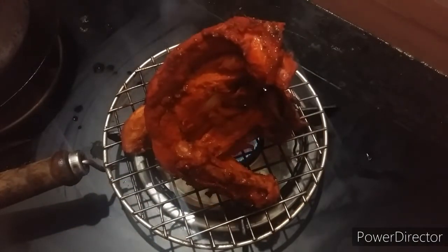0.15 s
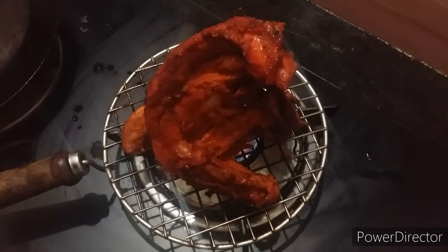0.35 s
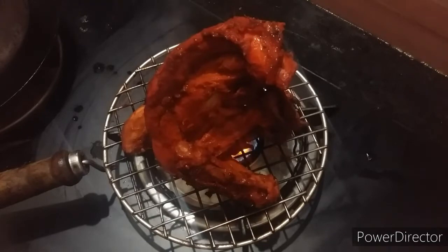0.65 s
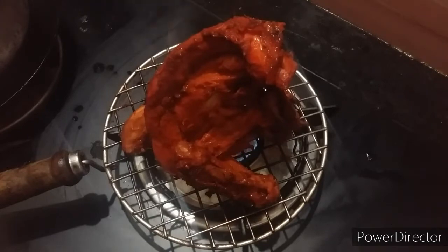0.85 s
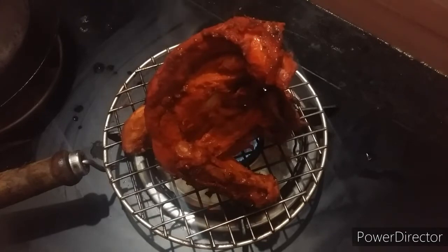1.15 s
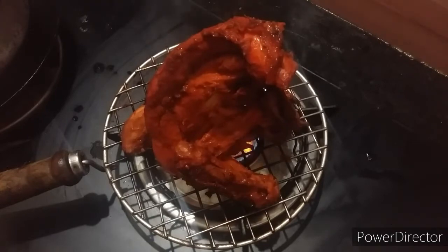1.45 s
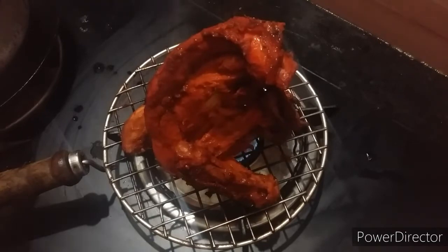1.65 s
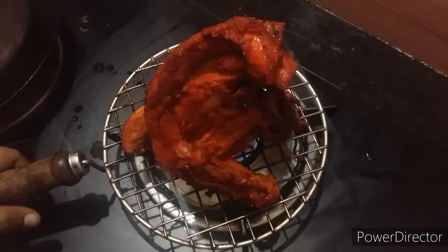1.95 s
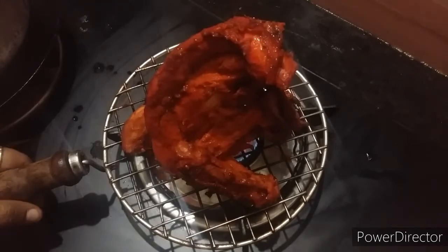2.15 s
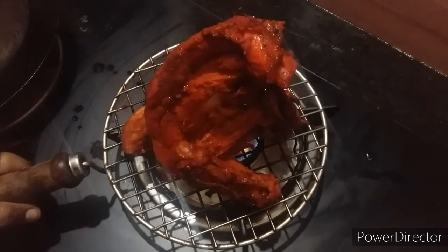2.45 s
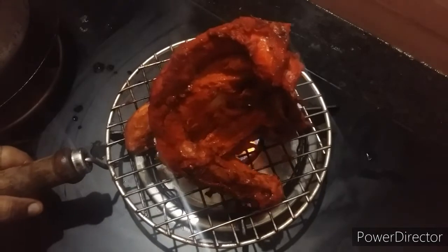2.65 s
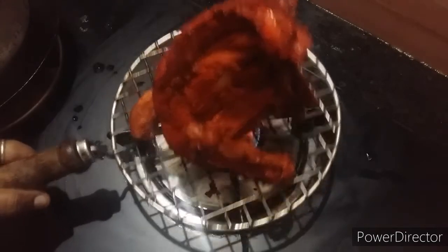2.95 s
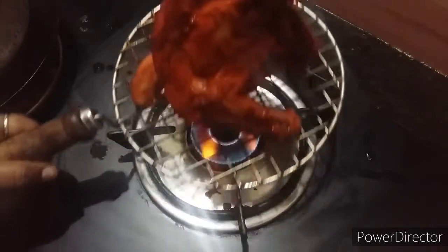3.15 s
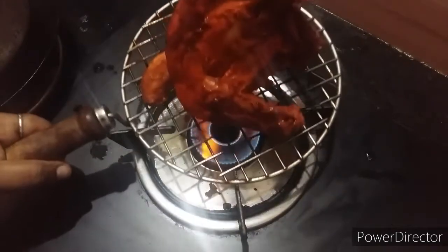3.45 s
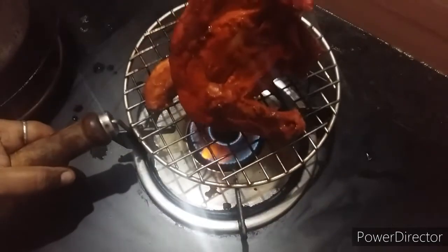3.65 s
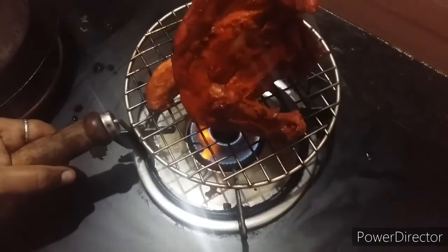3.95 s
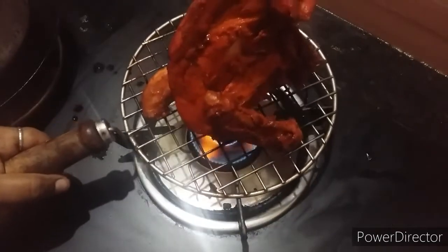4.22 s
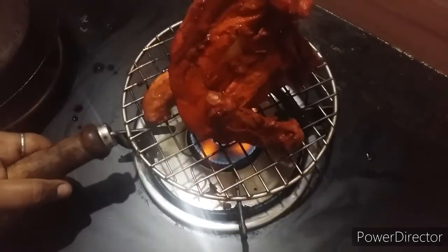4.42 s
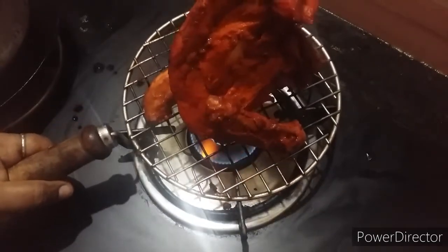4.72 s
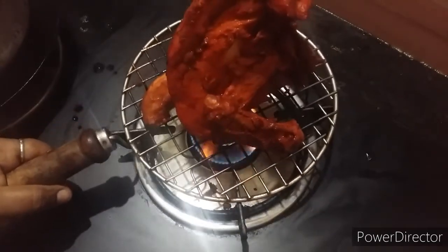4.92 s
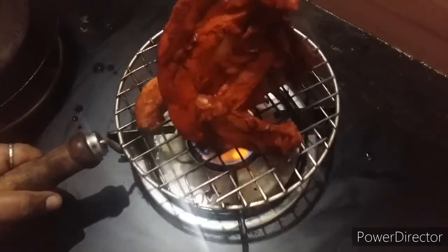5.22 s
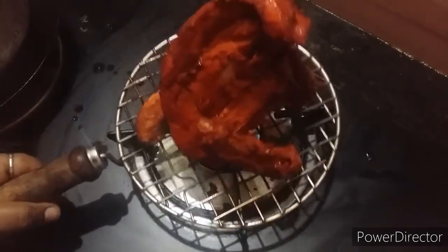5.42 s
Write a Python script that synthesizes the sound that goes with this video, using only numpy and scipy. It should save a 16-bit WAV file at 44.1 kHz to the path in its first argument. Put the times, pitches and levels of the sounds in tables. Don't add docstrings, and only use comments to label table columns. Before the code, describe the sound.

Chicken sizzles weakly on a wire rack over gas, with low room rumble and slight microphone hiss that swell and duck around each sound. A distant explosion-like bang opens the scene, then a muffled low thud. Light ticks lead to hollow metallic bumps and short scrapes as the rack is moved, with bright snaps of fat close to the microphone.

```python
import sys
import numpy as np
from scipy import signal
from scipy.fft import rfft, irfft, next_fast_len
from scipy.io import wavfile
from scipy.ndimage import uniform_filter1d, map_coordinates

SR = 44100
rng = np.random.default_rng(int(sys.argv[2]) if len(sys.argv) > 2 else 0)


def nominal_scale(level):
    x = np.asarray(level, float) / 20
    return 10 ** x


def wrap_up_sound(samples):
    columns = np.atleast_2d(samples).T
    tamed = np.clip(columns, -1, 1)
    steps = np.round(tamed * 32767).astype(np.int16)
    wavfile.write(sys.argv[1], SR, steps)


N = 246209


def unit(x):
    return x / np.sqrt(np.mean(x ** 2) + 1e-20)


def along(points, hz):
    f, v = np.transpose(points)
    return np.interp(np.log(hz + 1), np.log(f + 1), v)


def coloured(x, spectrum, humps=()):
    m = next_fast_len(N + 8192)
    hz = np.fft.rfftfreq(m, 1 / SR)
    lift = 1 + sum(nominal_scale(db) / (1 + (2 * (hz - c) / w) ** 2) for c, w, db in humps)
    return unit(irfft(rfft(x, m) * nominal_scale(along(spectrum, hz)) * lift, m)[:N])


def wobble(rate):
    knots = rng.standard_normal(int(N * rate / SR) + 4)
    return map_coordinates(knots, [np.arange(N) * rate / SR])


def flutter(rate):
    curve = wobble(rate)
    return unit(curve - uniform_filter1d(curve, size=SR // 14))


def patchy(patchy_db):
    z = signal.stft(rng.standard_normal(N + 1024), nperseg=1024)[2]
    field = uniform_filter1d(rng.standard_normal(z.shape), size=4, axis=0)
    field = uniform_filter1d(field, size=5, axis=1)
    return signal.istft(z * nominal_scale(patchy_db * unit(field)), nperseg=1024)[1][:N]


def crackle(rate, spread_db):
    struck = rng.random(N) < rate / SR
    return unit(struck * rng.standard_normal(N) * nominal_scale(spread_db * rng.random(N)))


def ring(modes, t, t60):
    return sum(nominal_scale(db + rng.normal(0, 1) - 60 * t / t60) * np.sin(2 * np.pi * hz * t) for hz, db in modes)


def smooth(coarse):
    return np.interp(np.arange(N), 32 * np.arange(len(coarse)), coarse)


def swells(rows, rise_s, fall_db_per_s):
    t = np.arange(0, N, 32) / SR
    power = 0
    for s, db, hold in rows:
        rise = np.clip((t - s) / rise_s, 0, 1)
        fall_db = fall_db_per_s * np.clip(t - s - rise_s - hold, 0, None)
        power = power + (rise * nominal_scale(db - fall_db)) ** 2
    return smooth(np.sqrt(power))


# frequency in Hz, level in dB per Hz.
SIZZLE_SPECTRUM = [(1000, -38), (1700, -9), (1770, -12.5), (2210, -10.5), (2380, -9), (2900, -7.5),
                   (3670, -2.5), (3800, -1.5), (3960, 0.5), (4680, -1.5), (5080, -4), (5390, -6.5),
                   (6000, -13), (7000, -16), (9100, -20), (15400, -120)]
# frequency in Hz, width in Hz, level in dB.
HOUSING = [(2290, 130, -4), (3883, 110, -1.5), (4380, 79, -6), (5380, 94, -12)]


def sizzle(treble_db, flicker):
    level_db = -67 + np.minimum(treble_db, 12)
    bubbles = unit(patchy(patchy_db=1.0)) + 0.49 * crackle(rate=500, spread_db=12)
    gain = nominal_scale(level_db + 0.89 * flicker + 0.67 * flutter(rate=11))
    return gain * coloured(bubbles, SIZZLE_SPECTRUM, HOUSING)


# start in seconds, peak in dB, port ring in Hz, click level in dB.
FAT_SPITS = [(0.6804, -49, 3860, -17), (0.768, -55, 3940, -18), (1.6912, -45, 3940, -23),
             (2.0322, -51, 3750, -18), (2.3286, -55, 3960, -11), (2.8134, -52.5, 4100, -11),
             (3.2356, -58, 4170, -12), (3.276, -45.5, 3680, -13), (3.458, -53.5, 3970, -12),
             (3.478, -43, 4070, -15.5), (3.6766, -45, 3700, -27), (3.9526, -39.5, 4180, -32),
             (4.1864, -32, 4170, -22.5), (4.57, -35, 4340, -20), (4.5824, -38, 4060, -25),
             (4.794, -47.5, 4040, -17.5), (4.9049, -39.5, 3870, -21.5), (5.0953, -52, 4070, -15),
             (5.4814, -64, 4490, -17)]
# frequency in Hz, level in dB per Hz.
CLICK_SPECTRUM = [(800, -10), (2000, -23), (4200, 3.5), (6500, -9), (9500, -13.5), (11500, -20),
                  (16000, -64)]


def spits():
    out, t = np.zeros(N + SR), np.arange(SR // 8) / SR
    hiss = coloured(rng.standard_normal(N), CLICK_SPECTRUM)
    for s, db, hz, click_db in FAT_SPITS:
        at = round(s * SR)
        modes = [(hz, 0), (hz * 0.97, -5), (hz * 1.2, -5), (hz * 0.75, -8), (hz * 0.48, -10), (hz * 0.3, -14)]
        port = ring(modes, t, t60=0.019)
        click = nominal_scale(click_db + 18 - 60 * t / 0.028) * hiss[at // 2:][:len(t)]
        onset = 1 - np.exp(-t / 0.0014)
        out[at:][:len(t)] += nominal_scale(db - 3.5) * onset * (port + click)
    return out[:N]


# start in seconds, peak in dB, body note in Hz, wire level in dB,
# rim level in dB.
RACK_KNOCKS = [(0.009, -48, 162, -11, 2.5), (1.378, -52.5, 223, -9, -9), (1.564, -51.5, 190, 2.5, -2),
               (1.876, -48, 189, -23, -15), (2.398, -48.5, 420, -7, -4), (2.814, -50.5, 360, -5, -21),
               (2.838, -44.5, 388, -25, -22), (2.884, -49, 213, -14, -22), (2.905, -42.5, 241, -13, -24),
               (2.952, -45, 394, -16, -13), (2.977, -33.5, 391, -15, -36), (2.999, -45, 405, -21, -16),
               (3.042, -56, 363, -10, -15), (3.088, -50, 215, -14, -12), (3.709, -31.5, 378, -6, -4.5),
               (3.842, -44, 390, -31, -24), (3.875, -45, 246, -7.5, 1.5), (3.991, -52.5, 400, -25, 1),
               (4.137, -50, 360, -28, -29), (4.57, -45.5, 352, -16, -15), (4.608, -50.5, 214, -2.5, -20),
               (5.231, -57.5, 177, 2, -24), (5.396, -49.5, 162, -10, -15), (5.419, -54, 211, -4, -17)]
# frequency in Hz, level in dB.
WIRE_NOTES = [(790, -14), (1030, -1.5), (1200, 4), (1260, -4), (1530, -2.5)]
# frequency in Hz, level in dB.
RIM_NOTES = [(2000, -9), (2385, 2), (2520, -4), (2950, -4.5), (3570, 3.5)]


def knocks():
    out, t = np.zeros(N + SR), np.arange(SR // 3) / SR
    body_t60_s = 0.072
    rattle_spectrum = [(100, -27), (300, -10), (1500, -16), (4000, -13), (7000, -39)]  # Hz, dB per Hz
    noise = coloured(rng.standard_normal(N), rattle_spectrum)
    for s, db, hz, wire_db, rim_db in RACK_KNOCKS:
        at = round(s * SR)
        body = ring([(hz, 0), (hz * 1.07, -6), (hz * 1.1, -9), (hz * 0.54, -8)], t, body_t60_s)
        wires = nominal_scale(wire_db + 3.5) * ring(WIRE_NOTES, t, 0.62 * body_t60_s)
        rim = nominal_scale(rim_db + 4.5) * ring(RIM_NOTES, t, 0.31 * body_t60_s)
        rattle = nominal_scale(wire_db + 3.5 - 60 * t / 0.025) * noise[at // 2:][:len(t)]
        onset = 1 - np.exp(-t / 0.0031)
        out[at:][:len(t)] += nominal_scale(db - 4.0) * onset * (body + wires + rim + rattle)
    return out[:N]


# start in seconds, level in dB, hold in seconds.
RACK_SLIDES = [(2.61, -70, 0.25), (2.83, -70, .01), (2.89, -61, .005), (2.96, -57, 0.076),
               (3.73, -57, 0.07), (3.83, -52.5, .005), (3.98, -66, .02), (4.13, -55.5, 0.063),
               (4.25, -67.5, 0.026), (4.56, -70, 0.086), (4.72, -68, .005)]
# frequency in Hz, width in Hz, level in dB.
RACK_FRAME = [(165, 45, 7), (336, 15, 18), (388, 18, 23), (518, 23, 13.5), (665, 9.4, 17.5)]


def slides():
    spectrum = [(100, -26), (200, -1.0), (800, 2.5), (1600, -37), (4000, -90)]  # Hz, dB per Hz
    hum = coloured(crackle(rate=330, spread_db=0.5), spectrum, RACK_FRAME)
    return nominal_scale(-1.0) * swells(RACK_SLIDES, rise_s=0.012, fall_db_per_s=147) * hum


# frequency in Hz, t60 in seconds.
KITCHEN_T60 = [(200, 0.11), (2000, 0.37), (8000, 0.15)]


def kitchen(x):
    hz, t, z = signal.stft(rng.standard_normal(SR // 2), SR, nperseg=256)
    decay = nominal_scale(-60 * t / along(KITCHEN_T60, hz)[:, None])
    tail = signal.istft(z * decay, SR, nperseg=256)[1]
    delayed = np.pad(x, (200, 0))
    return signal.fftconvolve(delayed, tail / np.linalg.norm(tail))[:N]


# start in seconds, level in dB, hold in seconds.
BANG_ARRIVALS = [
    (.2445, -30.5, .012),
    (.257, -32, 0.018),
    (.33, -33, 0.015),
    (.385, -44, 0.012),
]
# frequency in Hz, level in dB per Hz.
BANG_BASS_SPECTRUM = [(24, -67), (40, -39), (107, -12), (177, 0), (283, -4), (338, -2.5), (420, -13),
                      (550, -26), (920, -120)]
BANG_MIDDLE_SPECTRUM = [(240, -56), (400, -28), (483, 0), (616, -5), (862, -6.5), (934, -8.5), (1230, -3.5),
                        (2000, -20.5), (2600, -55), (4400, -120)]
BANG_TREBLE_SPECTRUM = [(940, -40), (1600, -3.5), (1910, -6), (2600, 0.5), (3150, -2.5), (4350, -3),
                        (5500, -9.5), (7840, -27.5), (11000, -38), (14300, -45), (22000, -120)]


def bang():
    since = np.clip(np.arange(N) / SR - BANG_ARRIVALS[0][0], 0, 1)
    bass_gain = nominal_scale(-19 * since) * (1 - np.exp(-since / 0.0094))
    treble_gain = nominal_scale(1.5 - 12.5 * since)
    echoes = unit(patchy(patchy_db=1.4)) + 0.22 * crackle(rate=3000, spread_db=16)
    clumps = nominal_scale(0.28 * wobble(89.6)) * swells(BANG_ARRIVALS, rise_s=0.002, fall_db_per_s=124)
    bass = bass_gain * coloured(echoes, BANG_BASS_SPECTRUM)
    middle = coloured(echoes, BANG_MIDDLE_SPECTRUM)
    treble = treble_gain * coloured(echoes, BANG_TREBLE_SPECTRUM)
    return clumps * (bass + middle + treble)


# start in seconds, level in dB, hold in seconds.
BOOM_ARRIVALS = [
    (1.057, -49, .004),
    (1.1, -51.5, 0.033),
    (1.135, -46.5, .01),
    (1.19, -64, 0.045),
]
# frequency in Hz, level in dB per Hz.
BOOM_SPECTRUM = [(15, -44), (25, -25), (59, -3), (129, -4.5), (152, 0.5), (200, -28), (320, -34),
                 (420, -48), (700, -120)]


def boom():
    gain = nominal_scale(1.1 * wobble(38.4)) * swells(BOOM_ARRIVALS, rise_s=0.013, fall_db_per_s=255)
    return gain * coloured(rng.standard_normal(N), BOOM_SPECTRUM)


# frequency in Hz, level in dB per Hz.
FLAME_SPECTRUM = [(160, -49), (270, 1), (611, -3), (767, -1), (956, -2), (1230, -1.5), (1630, -6),
                  (2200, -11), (2860, -23), (4840, -120)]
# frequency in Hz, width in Hz, level in dB.
BURNER_HOLLOWS = [(513, 23, -2), (801, 150, -6), (1251, 19, 1.5)]


def flame(bass_db, flicker):
    gain = nominal_scale(-70.5 + bass_db + 0.78 * flicker + 0.5 * flutter(rate=22))
    return gain * coloured(patchy(patchy_db=2.0), FLAME_SPECTRUM, BURNER_HOLLOWS)


# frequency in Hz, level in dB per Hz.
RUMBLE_SPECTRUM = [(15, -51), (25, -20), (43, -16), (98, -3), (135, -7.5), (194, 0), (236, -3.5),
                   (300, -35), (390, -35), (660, -120)]


def rumble(bass_db, flicker):
    gain = nominal_scale(-71.5 + 0.86 * bass_db + 1.3 * flicker)
    return gain * coloured(rng.standard_normal(N), RUMBLE_SPECTRUM)


# frequency in Hz, level in dB per Hz.
HISS_SPECTRUM = [(3000, -55), (5500, 2.5), (6500, 0), (11000, -1), (15700, -0.5), (17000, -28)]


def self_noise(treble_db, flicker):
    slow_db = uniform_filter1d(treble_db, int(0.064 * SR) + 1)
    gain = nominal_scale(-70.5 + 0.61 * slow_db + 0.41 * flicker)
    return gain * coloured(patchy(patchy_db=-0.5), HISS_SPECTRUM)


# start in seconds, treble opening in dB,
# bass opening in dB, hold in seconds.
SUPPRESSOR_OPENINGS = [(-.03, 12, 10, .07), (0.113, 6.5, 4.5, 0.067), (0.274, 17, 15.5, 0.21),
                       (0.496, 7.5, 4.5, 0.11), (0.654, 5, 5, 0.017), (0.76, 4.5, 3, .03),
                       (0.85, 3.5, 2.5, 0.045), (1.053, 8, 11, 0.092), (1.256, 3, 4.5, .05),
                       (1.342, 8.5, 8, 0.036), (1.512, 5.5, 7, 0.11), (1.707, 5, 4.5, 0.051),
                       (1.805, 5.5, 7.5, 0.056), (2.025, 3.5, 3.5, .2), (2.321, 4, 7, 0.13),
                       (2.586, 4, 5, 0.21), (2.773, 5.5, 9.5, .07), (2.878, 9, 10, 0.12),
                       (2.986, 13, 10.5, 0.036), (3.196, 3, 0, 0.12), (3.45, 4.5, 2, 0.06),
                       (3.658, 4.5, 5.5, .02), (3.69, 8, 10, 0.2), (3.92, 7.5, 6, 0.065),
                       (4.121, 5.5, 8, .07), (4.194, 9.5, 7, 0.093), (4.419, 6.5, 8, 0.098),
                       (4.558, 8, 8.5, 0.092), (5.068, 2.5, 3, 0.17), (5.357, 3, 2.5, 0.025)]


def opening(column, close_s):
    t = np.arange(0, N, 32) / SR
    open_s = 0.02
    curves = []
    for row in SUPPRESSOR_OPENINGS:
        since, hold = t - row[0], row[3]
        closing = 1 - (since - open_s - hold) / close_s
        curves.append(row[column] * np.clip(np.minimum(since / open_s, closing), 0, 1))
    return smooth(np.max(curves, axis=0))


def background():
    treble_db = opening(column=1, close_s=0.14)
    bass_db = opening(column=2, close_s=0.16)
    flicker = flutter(rate=71)
    near = sizzle(treble_db, flicker) + flame(bass_db, flicker)
    return near + rumble(bass_db, flicker) + self_noise(treble_db, flicker)


def scene():
    fat, rack = spits(), knocks()
    room = kitchen(nominal_scale(-9) * fat + nominal_scale(-6.0) * rack)
    return (fat + rack + room + slides() + bang() + boom() + background())[None]


def band_limit(x):
    return signal.sosfilt(signal.butter(12, 15760, fs=SR, output="sos"), x)


def record(dry):
    kept = np.fft.rfftfreq(N, 1 / SR) < 15490
    mix = irfft(rfft(dry - 0.0003) * kept, N)
    return band_limit(mix)


dry = scene()
out = record(dry)
wrap_up_sound(out)
```